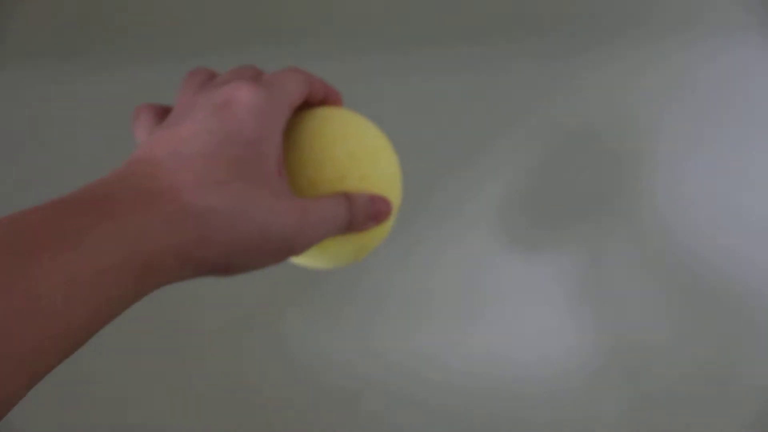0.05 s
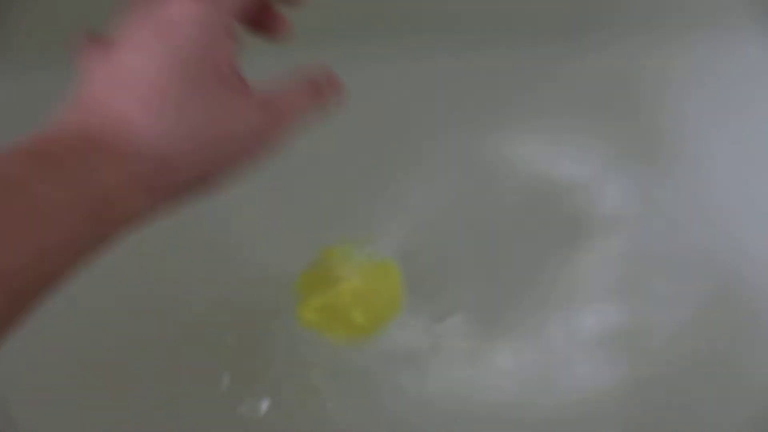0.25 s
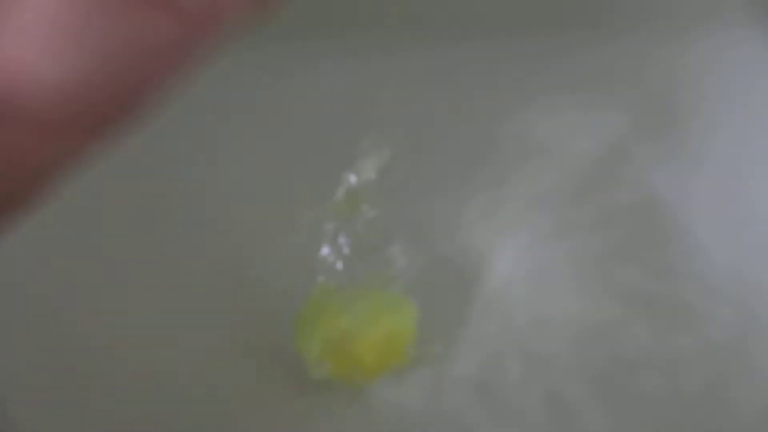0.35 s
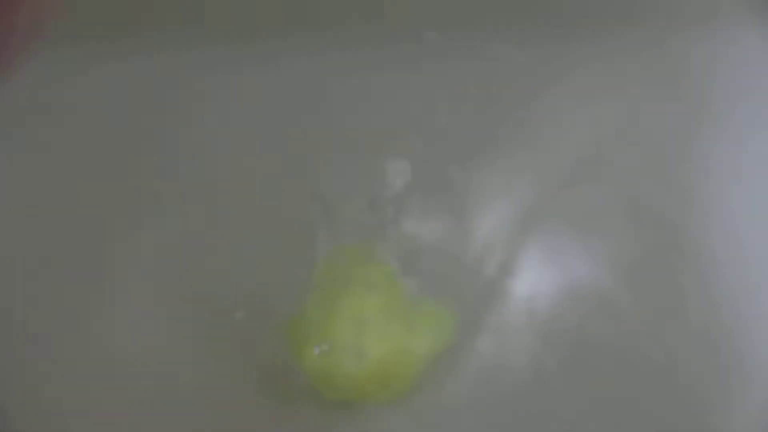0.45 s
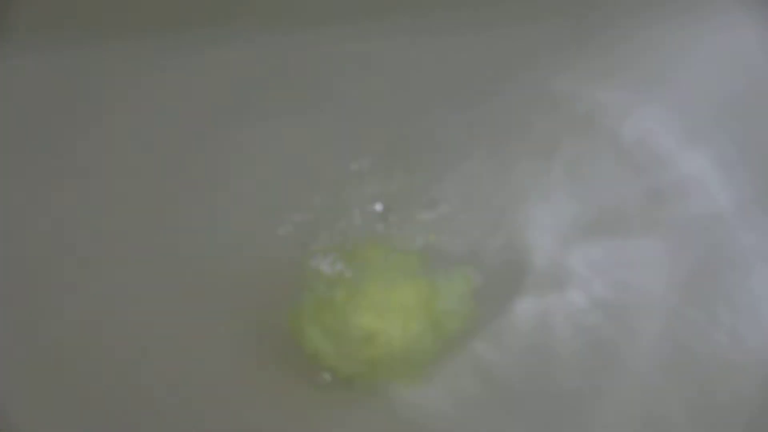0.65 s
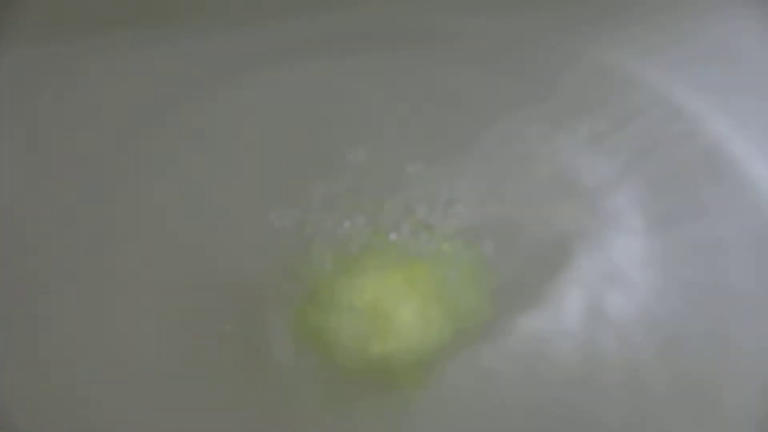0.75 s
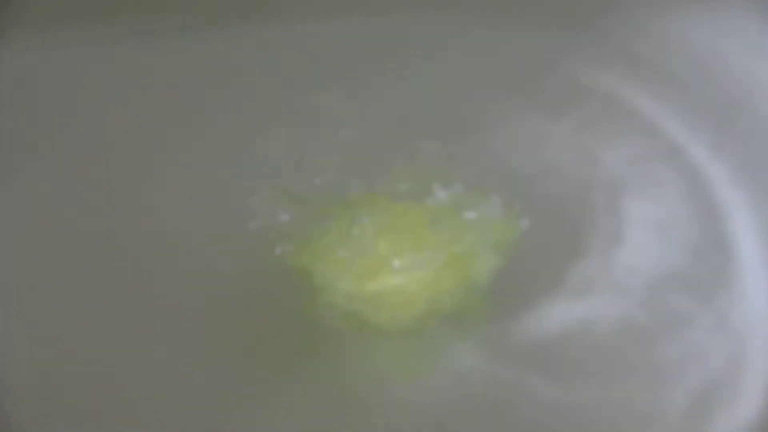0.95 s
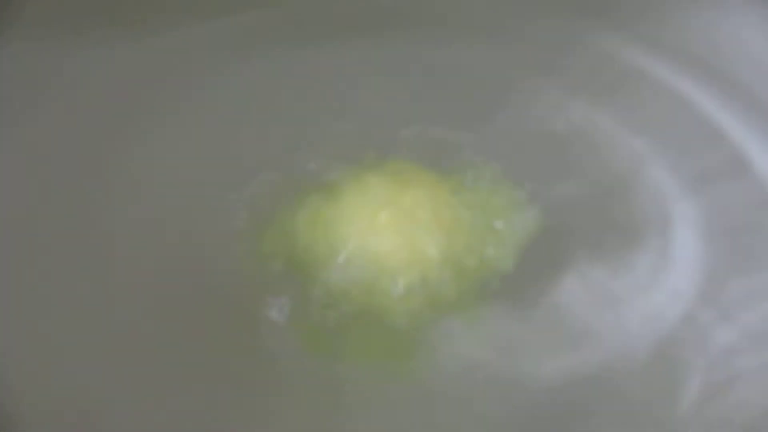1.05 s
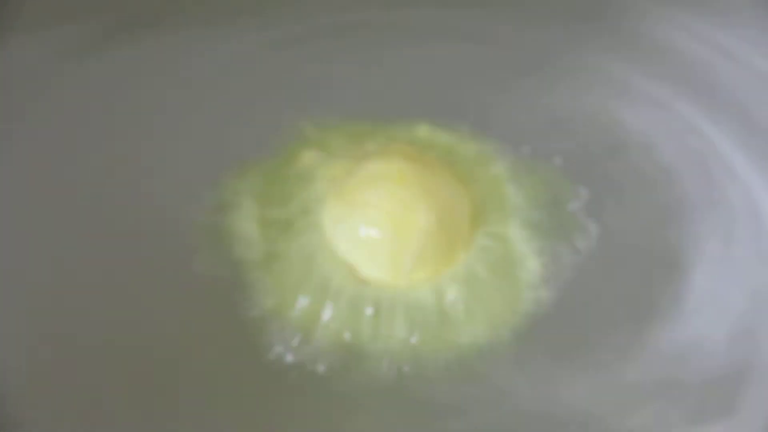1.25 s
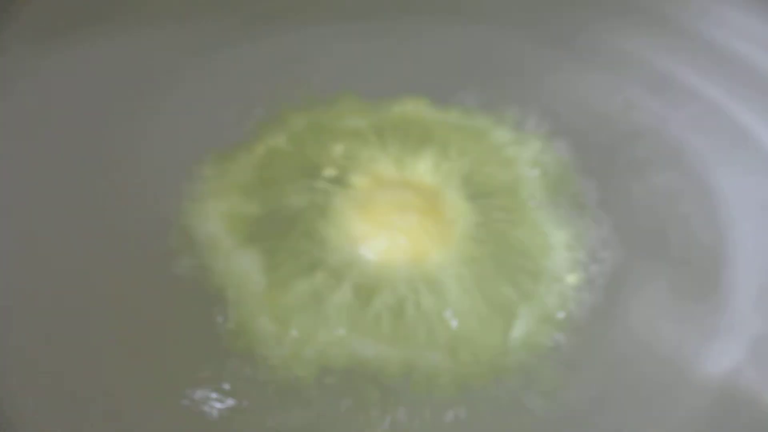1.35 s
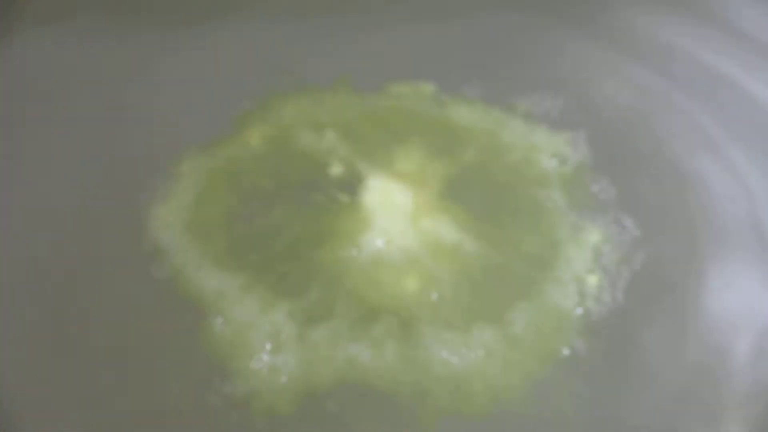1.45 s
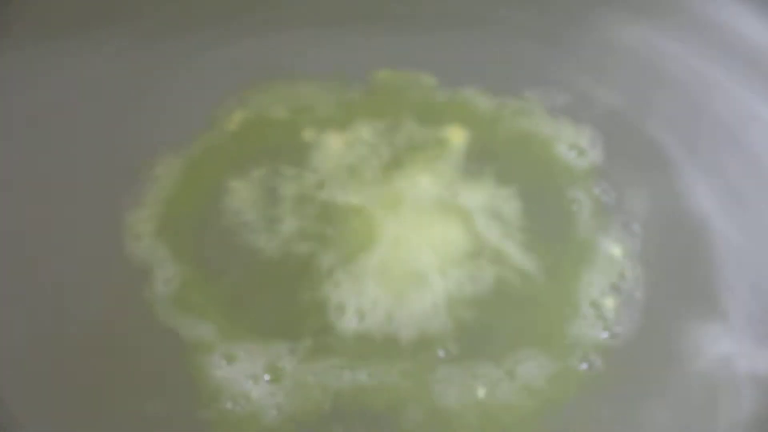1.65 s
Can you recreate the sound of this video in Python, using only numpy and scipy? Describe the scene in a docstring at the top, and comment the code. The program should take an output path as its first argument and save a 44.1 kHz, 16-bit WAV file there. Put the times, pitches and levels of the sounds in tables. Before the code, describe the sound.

Bath bomb dropped in a filled tub: small plop, hollow thud, bubbly resurfacing, then crackling fizz

```python
"""A short dry swish, a watery plop and a thud: a bath bomb slides from the fingers to the tub's bottom.
Small plinks follow as splashed drops fall back; the bomb comes up, breaks the surface and fizzes.
Filtered noise makes the swish, wash, cracks and hiss; decaying sines make bubbles, tub and air pockets.
Random specks add grain, and a few sharp pops stand out. A small tiled bathroom answers, over a faint hum."""
import sys
import numpy as np
from scipy import signal
from scipy.fft import rfft, irfft, next_fast_len
from scipy.io import wavfile

SR = 44100
rng = np.random.default_rng(int(sys.argv[2]) if len(sys.argv) > 2 else 0)


def materialize(psi):
    """Save the field psi as 16-bit PCM at rate SR to the path in sys.argv[1].

    A 1-D psi becomes a single channel; in a 2-D psi each row is a channel.
    """
    bounded = np.clip(np.atleast_2d(psi).T, -1, 1)
    quanta = np.round(bounded * 32767).astype(np.int16)
    wavfile.write(sys.argv[1], SR, quanta)


N = 74970


def amp(db):
    """Decibels to gain."""
    return 10 ** (np.asarray(db) / 20)


def unit(x):
    """Scaled to rms 1."""
    return x / np.sqrt(np.mean(x ** 2) + 1e-20)


def along(points, hz):
    """(Hz, value) points read on a log frequency axis."""
    point_hz, values = np.transpose(points)
    return np.interp(np.log(hz + 1), np.log(point_hz + 1), values)


def since(s):
    """Seconds since s, zero before it."""
    return np.maximum(np.arange(N) / SR - s, 0)


def fade(t, t60, attack):
    """A quick rise with time constant attack, and an exponential decay of 60 dB per t60."""
    return amp(-60 * t / t60) * (1 - np.exp(-t / attack))


def swell(s, width):
    """A bell-shaped envelope around s; width is its standard deviation."""
    return np.exp(-.5 * ((since(0) - s) / width) ** 2)


def filtered(x, response):
    """x times a response of frequency."""
    size = next_fast_len(N + SR // 2)
    spectrum = rfft(x, size) * response(np.fft.rfftfreq(size, 1 / SR))
    return irfft(spectrum, size)[:N]


def coloured(x, spectrum):
    """x shaped by the given spectrum, rms 1."""
    return unit(filtered(x, lambda hz: amp(along(spectrum, hz))))


def noise(spectrum):
    """Fresh coloured noise, rms 1."""
    return coloured(rng.standard_normal(N), spectrum)


def dying(spectrum, t60s, s):
    """Noise from s on, each frequency dying at its own speed."""
    hz, t, bins = signal.stft(noise(spectrum), SR, nperseg=512)
    bins = bins * amp(-60 * np.maximum(t - s, 0) / along(t60s, hz)[:, None])
    return signal.istft(bins, SR)[1][:N] * (since(s) > 0)


def specks(per_s, spread_db):
    """Random tiny impulses of unequal size; spread_db scales an exponential scatter of levels."""
    chance = rng.random(N)
    size = np.minimum(rng.exponential(size=N), 5)
    return (chance < per_s / SR) * amp(spread_db * size) * rng.choice([-1, 1], N)


def background():
    """Room air as steady coloured noise, and a low hum as one sine."""
    # Spectrum of the room air. Each row: frequency in Hz, relative level in dB.
    air_spectrum = [(25, -4), (60, -2), (160, 2.5), (400, -1.5), (900, -5.5), (2500, -13.5), (8000, -15.5),
                    (15000, -17)]
    air_db, hum_hz, hum_db = -57.5, 59.5, -57.5
    hum = amp(hum_db) * np.sin(2 * np.pi * hum_hz * since(0))
    return amp(air_db) * noise(air_spectrum) + hum


def bathroom(x, room_db):
    """Close echoes from the tub's sides, then the tail of the tiled room."""
    # Decay of the tail. Each row: frequency in Hz, time to fall 60 dB in seconds.
    room_t60 = [(150, 0.26), (1000, 0.53), (4500, 0.31), (9000, 0.14), (15000, 0.27)]
    # Spectrum of echoes and tail. Each row: frequency in Hz, relative level in dB.
    room_colour = [(100, 7), (1000, 3), (4500, 4), (8000, 0.5), (14000, -1)]
    walls_db, walls_t60_s, walls_delay_s = -5.5, 0.012, 0.0013
    walls = noise(room_colour) * fade(since(walls_delay_s), walls_t60_s, attack=0.00019)
    tail = dying(room_colour, room_t60, s=0.0081)
    # both parts have energy 1 before their levels
    answer = amp(walls_db) * walls / np.linalg.norm(walls)
    answer += amp(room_db) * tail / np.linalg.norm(tail)
    return x + signal.fftconvolve(x, answer)[:N]


def slide():
    """Fingers slide off the chalky ball: a short dry swish of skin on powder."""
    # Spectrum of the swish. Each row: frequency in Hz, relative level in dB.
    slide_spectrum = [(200, -41), (900, -27), (1600, -6.5), (3200, -3.5), (7000, -4), (15500, -4)]
    slide_s, width_s, slide_db = 0.058, 0.021, -39.5
    return amp(slide_db) * swell(slide_s, width_s) * noise(slide_spectrum)


def sloshes():
    """Grainy wash and a hollow gulp as the ball goes under and comes up; an air pocket rings below."""
    # Water parting and closing. Each row: centre in seconds, width in seconds, level in dB.
    slosh_times = [(0.201, .028, -48), (1.014, 0.016, -45.5), (1.167, 0.026, -43)]
    # Spectrum of the wash. Each row: frequency in Hz, relative level in dB.
    slosh_spectrum = [(100, 6.5), (400, -1), (1300, 5), (2600, -1.5), (5000, -5), (15000, -26)]
    # Gulps as water closes over the ball and as it surfaces. Each row: time in seconds, level in dB.
    gulp_times = [(.222, -53), (1.033, -36)]
    # Spectrum of a gulp. Each row: frequency in Hz, relative level in dB.
    gulp_spectrum = [(100, -44), (280, -9.5), (420, 1), (750, -0.5), (1100, -6), (3000, -34), (10000, -44)]
    gulp_width_s = 0.0036
    pocket_hz, pocket_t60_s, pocket_attack_s, pocket_db = 490, 0.015, 0.0027, 0  # dB within the gulp

    wash = coloured(specks(per_s=2800, spread_db=4.5), slosh_spectrum)
    out = wash * sum(amp(db) * swell(s, width) for s, width, db in slosh_times)
    for s, db in gulp_times:
        t = since(s)
        pocket = amp(pocket_db) * fade(t, pocket_t60_s, pocket_attack_s)
        pocket = pocket * np.sin(2 * np.pi * pocket_hz * t)
        out += amp(db) * (noise(gulp_spectrum) * swell(s, gulp_width_s) + pocket)
    return out


def thud():
    """The ball crunches on the bottom, pushes it in and sets the tub's modes ringing."""
    # Single tub modes. Each row: pitch in Hz, relative level in dB, t60 in seconds before damping.
    tub_modes = [(109.8, -14, 0.43), (158.7, -15.5, 1.02), (178.7, -19, 1.07), (265.6, -6, 0.56),
                 (350.2, -4, 0.52), (387.2, -4.5, 0.39), (436.3, -3, 0.4), (464, -5, 0.3),
                 (494, -17.5, 0.55), (660, -41.5, 3.54), (752, -16.5, 0.49), (759, -14, 0.21),
                 (816, -23, 0.23), (962, -16.5, .33)]
    # Dense wall modes, as noise. Each row: frequency in Hz, relative level in dB.
    boom_spectrum = [(40, -55), (65, -18), (90, -16), (130, -10.5), (200, -12), (280, 2), (450, -2.5),
                     (600, -14.5), (850, -9.5), (1150, -19.5), (2500, -22.5), (4300, -29), (5500, -32),
                     (8000, -35.5), (15000, -43)]
    # Decay of the dense modes. Each row: frequency in Hz, time to fall 60 dB in seconds.
    boom_t60 = [(90, 0.86), (250, 0.53), (700, 0.43), (2500, 0.41), (10000, 0.29)]
    # Spectrum of the crunch. Each row: frequency in Hz, relative level in dB.
    crunch_spectrum = [(200, -25), (900, 6.5), (1500, 6.5), (2800, 3), (4400, -1.5), (5500, -18.5),
                       (7800, -2.5), (9300, -14), (10700, -7), (15000, -15.5)]
    touch_s, thud_s = .3768, .3798
    tub_db, tub_attack_s, tub_damping = -13, 0.0027, 1.09  # damping divides every mode's t60
    push_db, push_hz, push_t60_s = -11, 423, 0.11
    boom_db, crunch_db, crunch_t60_s = -17, -18.5, 0.11

    t = since(thud_s)
    ring = np.zeros(N)
    for hz, db, t60 in tub_modes:
        ring += amp(db) * fade(t, t60 / tub_damping, tub_attack_s) * np.sin(2 * np.pi * hz * t)
    push = amp(push_db) * fade(t, push_t60_s, attack=0.00014) * np.sin(2 * np.pi * push_hz * t)
    grit = coloured(specks(per_s=4200, spread_db=2.5), crunch_spectrum)
    crunch = amp(crunch_db) * grit * fade(since(touch_s), crunch_t60_s, attack=0.00049)
    boom = amp(boom_db) * dying(boom_spectrum, boom_t60, thud_s)
    return crunch - push - amp(tub_db) * ring + boom


def bubbles():
    """Each bubble opens with a noise tick, rings briefly in the water and rises in pitch."""
    # Bubbles. Each row: start in seconds, starting pitch in Hz, ring level in dB, ring t60 in seconds,
    # pitch gain over one t60 as a fraction, tick level in dB.
    bubble_rows = [(.176, 2370, -27.5, 0.013, .02, -49), (0.185, 2490, -33.5, 0.087, 0.023, -48),
                   (0.2038, 900, -28, 0.027, 0.11, -50), (.204, 5700, -29, 0.014, .03, -53),
                   (0.222, 1424, -33, 0.029, .1, -52), (0.632, 9000, -52, .005, 0.4, -53),
                   (0.6923, 6640, -38.5, 0.01, .1, -49), (.714, 4940, -45, 0.013, .1, -52.5),
                   (0.7577, 5050, -34, 0.009, .1, -46.5), (0.861, 1253, -39.5, 0.11, 0.82, -61),
                   (.859, 2220, -53.5, 0.17, 0.33, -61), (0.906, 4080, -42.5, 0.018, 0.33, -55.5),
                   (0.937, 5450, -36, 0.0063, 0.25, -50.5), (0.954, 5560, -42, 0.0081, 0.17, -45.5),
                   (0.991, 1300, -44, 0.035, 0.18, -52), (1.012, 4700, -35, 0.01, .3, -46),
                   (1.025, 6120, -33, .008, 0.11, -53), (1.076, 2750, -32.5, 0.021, .1, -41),
                   (1.1435, 2180, -17.5, 0.0049, .1, -42), (1.158, 2720, -30, 0.027, 0.12, -44),
                   (1.16, 5400, -17, 0.01, 0.093, -33), (1.2, 3370, -29.5, 0.0097, 0.28, -41),
                   (1.425, 2470, -24.5, 0.017, 0.085, -24), (1.453, 2480, -22, 0.017, .3, -36),
                   (1.459, 4850, -18, .007, .3, -34.5), (1.692, 1940, -37.5, 0.058, 0.1, -76)]
    # Spectrum of the ticks. Each row: frequency in Hz, relative level in dB.
    tick_spectrum = [(200, -5), (800, 3), (2000, -1), (5000, 2.5), (9000, 2), (15000, -14)]
    ring_attack_s, tick_t60_s = 0.00056, 0.02

    rings, ticks = np.zeros((2, N))
    for s, hz, db, t60, rise, tick_db in bubble_rows:
        t = since(s)
        pitch = hz * (1 + rise * np.minimum(t / t60, 1)) * (t > 0)
        phase = np.cumsum(pitch) / SR  # in cycles
        rings += amp(db) * fade(t, t60, ring_attack_s) * np.sin(2 * np.pi * phase)
        ticks += amp(tick_db) * fade(t, tick_t60_s, attack=0.000089)
    return rings + ticks * noise(tick_spectrum)


def pops():
    """Gas pockets burst: a pressure spike, a few strong cycles, a broad crack and a fine dying spray."""
    # Pops. Each row: start in seconds, starting pitch in Hz, ring level in dB,
    # half the ring's time to peak in seconds, crack level in dB, spray level in dB.
    pop_rows = [(.2353, 11720, -5.5, 0.000079, -11.5, -37.5), (0.993, 8600, -44, 0.00022, -46, -66),
                (1.0158, 10700, -33, 0.00012, -36, -58), (1.101, 9300, -39, 0.00011, -39, -67),
                (1.1347, 13900, -9.5, 0.000067, -39, -51), (1.4242, 4210, -4, 0.00021, -15, -32)]
    # Spectrum of the crack. Each row: frequency in Hz, relative level in dB.
    crack_spectrum = [(40, -22), (150, -13), (500, -5), (1500, -11), (3500, -5), (7500, 13.5),
                      (10000, 16.5), (15000, -16)]
    # Spectrum of the spray. Each row: frequency in Hz, relative level in dB.
    spray_spectrum = [(80, -11.5), (300, 5.5), (1200, 0.5), (2600, 3), (5500, 5.5), (9000, -2.5),
                      (15000, -16)]
    snap_db, snap_s = 14.5, .00003  # pressure pulse: level over the crack, before differencing; time to peak
    pitch_rise = 0.061  # early pitch gain, as a fraction per time to peak
    crack_t60_s, spray_t60_s, spray_attack_s = 0.0072, 0.31, 0.002

    rings, cracks, sprays = np.zeros((3, N))
    for s, hz, ring_db, half_peak_s, crack_db, spray_db in pop_rows:
        t = since(round(s * SR) / SR)  # start on a whole sample
        u, v = t / (2 * half_peak_s), t / snap_s
        cycles = hz * t * (1 + pitch_rise * np.minimum(u, 10) / 2)
        rings += amp(ring_db) * (u * np.exp(1 - u)) ** 2 * np.sin(2 * np.pi * cycles)
        rings += amp(crack_db + snap_db) * np.diff(v * np.exp(1 - v), prepend=0)
        cracks += amp(crack_db) * fade(t, crack_t60_s, attack=.00005)
        sprays += amp(spray_db) * fade(t, spray_t60_s, spray_attack_s)
    spray = coloured(specks(per_s=6000, spread_db=2.0), spray_spectrum)
    return rings + cracks * noise(crack_spectrum) + sprays * spray


def grains(count):
    """Tiny bubbles at random times, each ringing for a few cycles; rms 1."""
    middle_hz, scatter_octaves, cycles_to_60_db, spread_db = 6000, 0.68, 7.9, 5
    when = rng.random(count)
    size = np.minimum(rng.exponential(size=count), 5)
    pitch = rng.standard_normal(count)
    hz = np.clip(middle_hz * 2 ** (scatter_octaves * pitch), 600, 20000)[:, None]
    k = np.arange(256)  # samples in one grain
    cycles = hz * k / SR
    rows = amp(spread_db * size)[:, None] * np.sqrt(hz)
    rows = rows * amp(-60 * cycles / cycles_to_60_db) * np.sin(2 * np.pi * cycles)
    places = (when * N).astype(int)[:, None] + k
    return unit(np.bincount(places.ravel(), rows.ravel(), N)[:N])


def fizz():
    """Countless small bubbles burst: a hiss with ticks and tiny rings on top."""
    # Strength of the fizz. Each row: time in seconds, level in dB.
    fizz_level = [(0, -55.5), (.25, -58), (.6, -75), (.8, -71), (.97, -64), (1.02, -57), (1.09, -53.5),
                  (1.16, -47), (1.28, -48), (1.4, -49.5), (1.549, -50), (1.7, -53.5)]
    # Spectrum of hiss and ticks. Each row: frequency in Hz, relative level in dB.
    fizz_spectrum = [(100, -7), (300, 1), (600, -4), (1200, -5.5), (2200, -4.5), (3200, -6), (4800, 1.5),
                     (7000, -2), (10000, -0.5), (15500, -1.5)]
    hiss_db, ticks_db, grain_db = -1.5, -9.5, -4  # relative to the fizz level
    level_db = np.interp(since(0), *np.transpose(fizz_level))
    ticks = coloured(specks(per_s=4000, spread_db=-4.5), fizz_spectrum)
    mix = amp(hiss_db) * noise(fizz_spectrum) + amp(ticks_db) * ticks
    mix += amp(grain_db) * grains(count=2500)
    return amp(level_db) * mix


def scene():
    """Water and pops sound in the room, the tub booms with its own tail; air and hum lie below."""
    low_cut_hz = 62  # spares the air and hum
    water = bathroom(slide() + sloshes() + bubbles() + fizz(), room_db=-11.5)
    events = water + bathroom(pops(), room_db=-12) + thud()
    low_cut = signal.butter(4, low_cut_hz, "high", fs=SR, output="sos")
    return (signal.sosfilt(low_cut, events) + background())[None]


def record(dry):
    """The highest peaks are rounded off below 0.8, then a steep low-pass limits the band."""
    top_hz = 16000
    held = dry[0] / (1 + np.abs(dry[0] / .8) ** 6) ** (1 / 6)
    return filtered(held, lambda hz: 1 / (1 + (hz / top_hz) ** 160))[None]


dry = scene()
out = record(dry)
materialize(out)
```